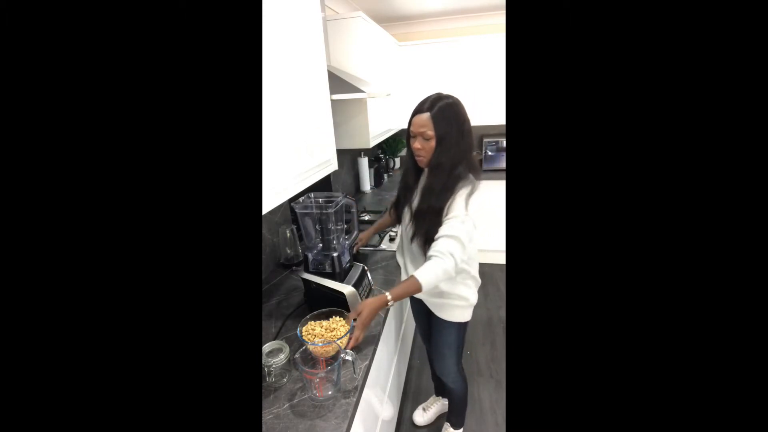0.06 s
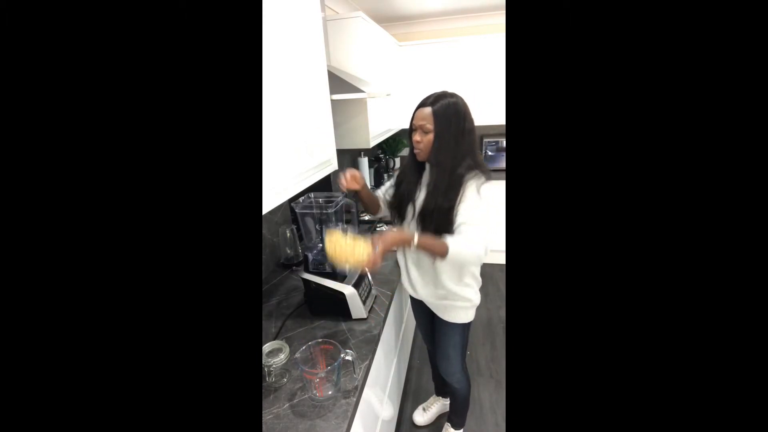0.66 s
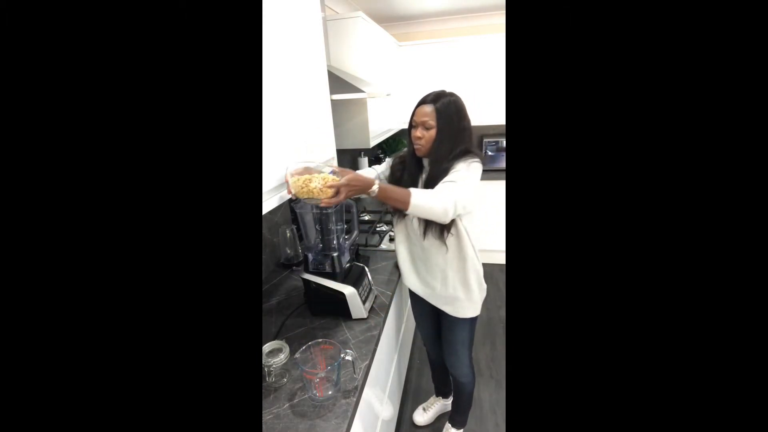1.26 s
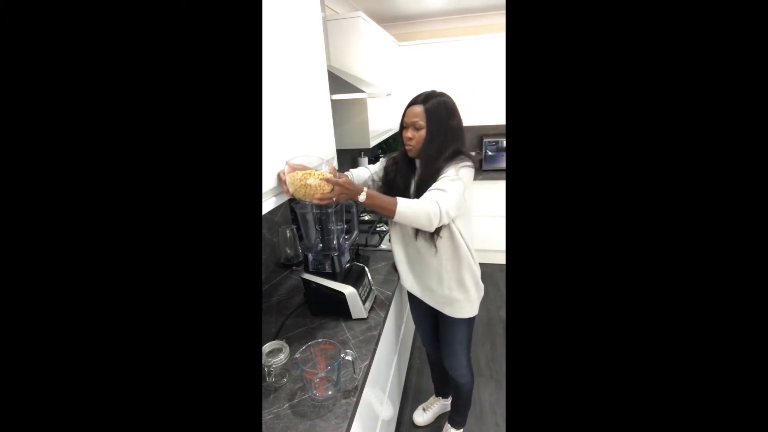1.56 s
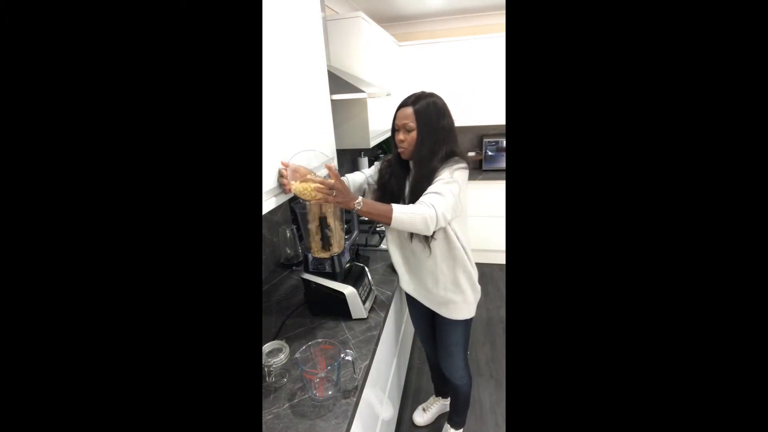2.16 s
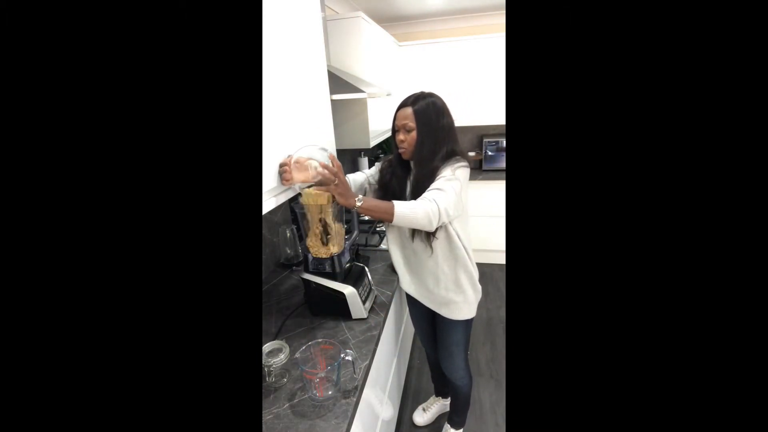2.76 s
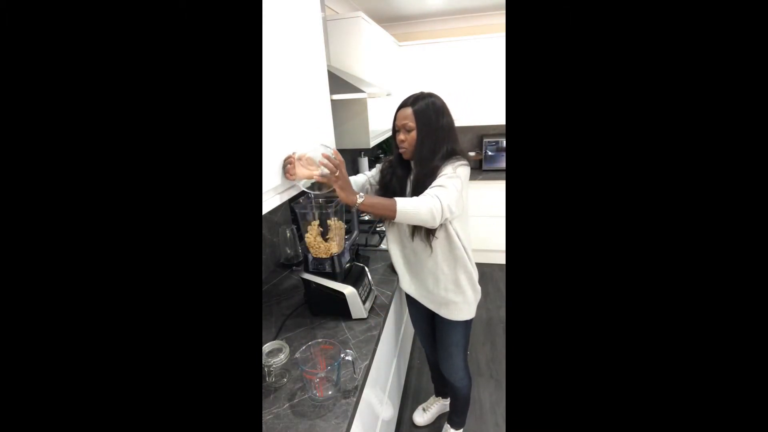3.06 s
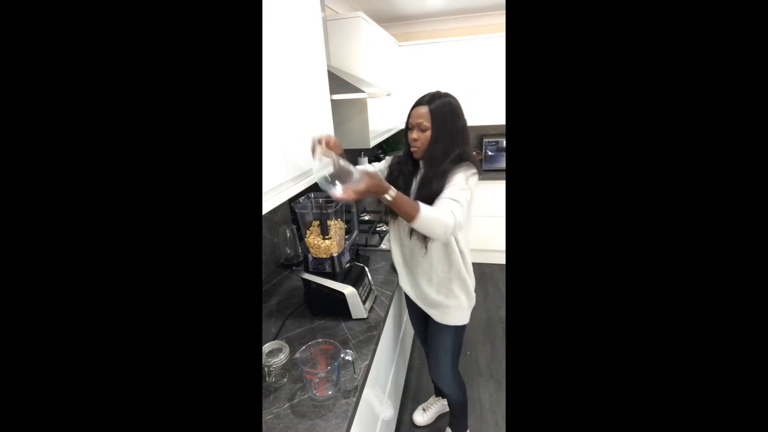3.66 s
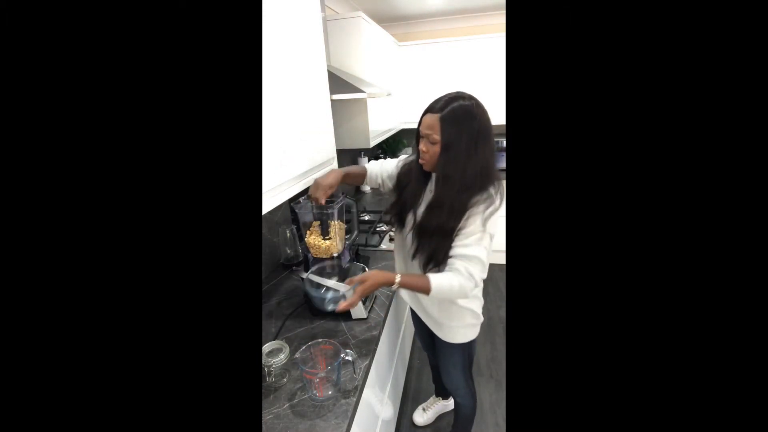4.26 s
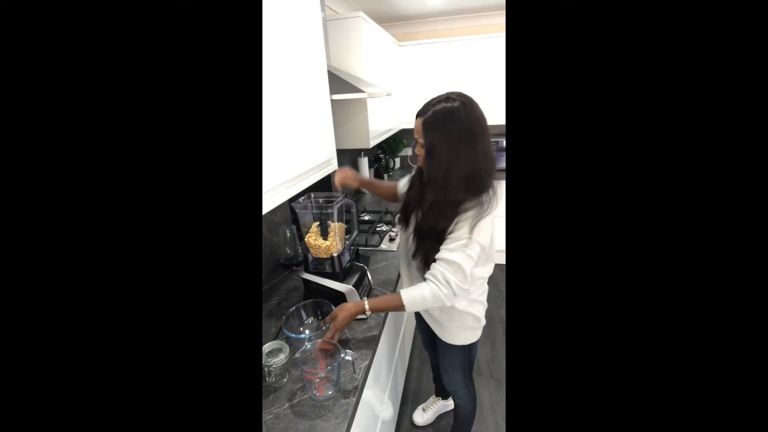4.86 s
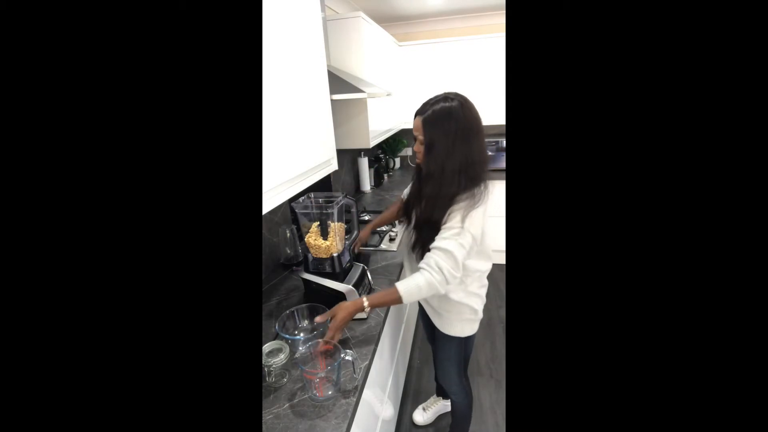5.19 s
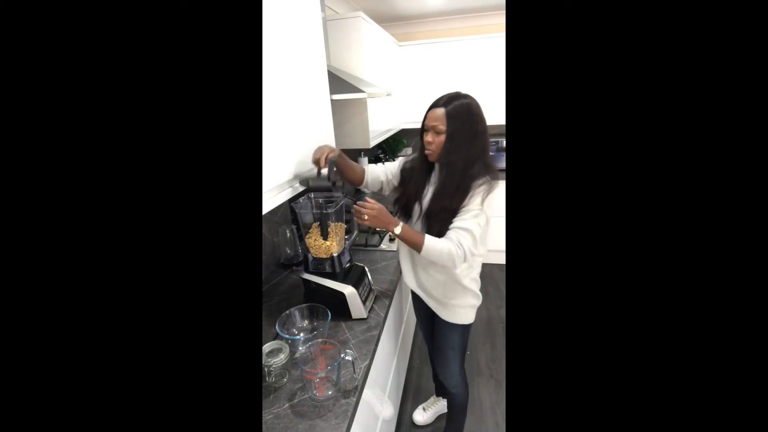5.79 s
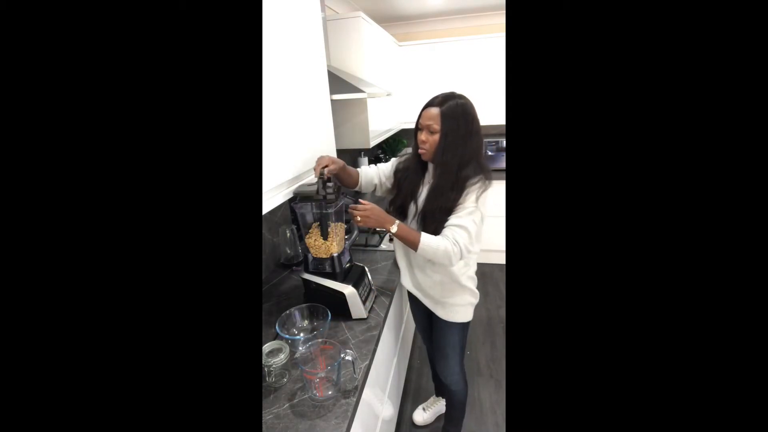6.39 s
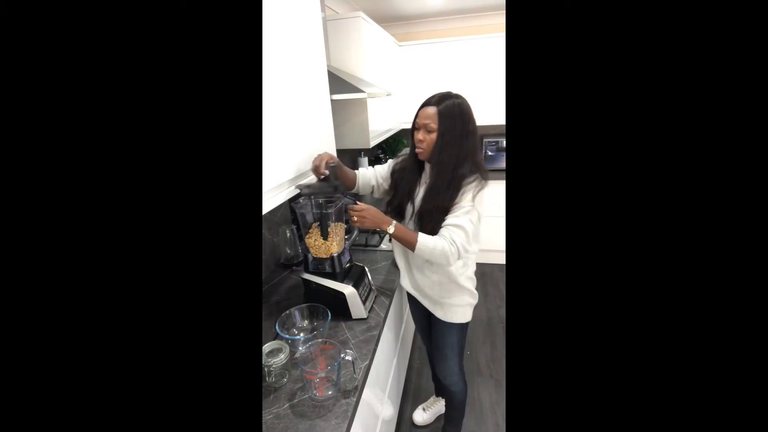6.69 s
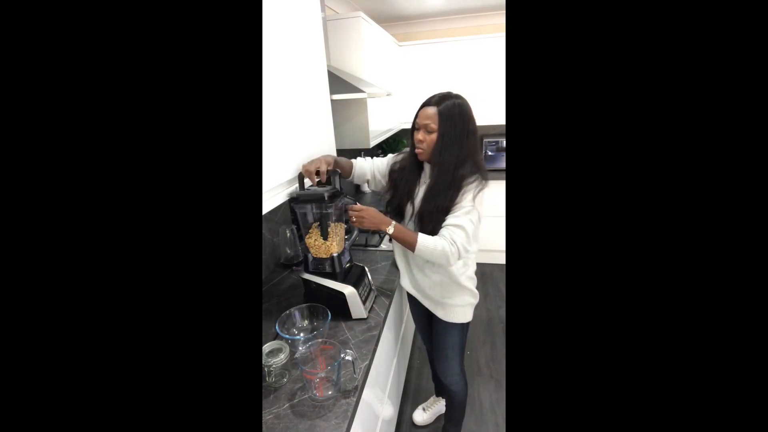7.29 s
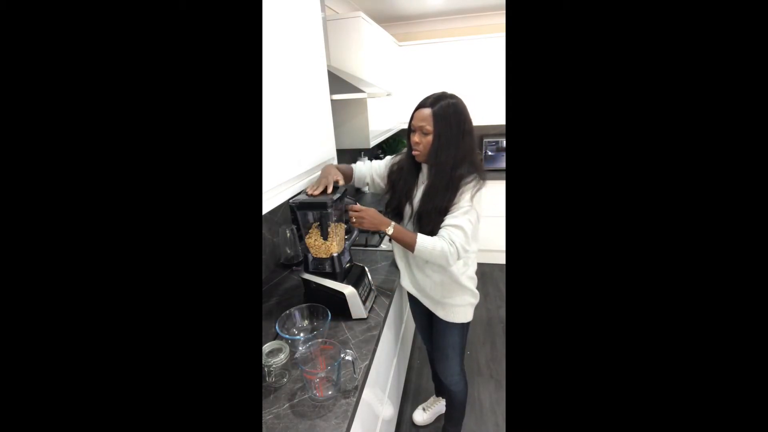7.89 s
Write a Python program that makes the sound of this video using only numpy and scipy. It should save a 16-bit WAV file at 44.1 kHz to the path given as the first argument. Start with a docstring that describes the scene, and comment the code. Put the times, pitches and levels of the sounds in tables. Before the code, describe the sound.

Roasted nuts rattle from a glass bowl into a plastic blender jug, then the bowl knocks down and the lid clatters on.

```python
"""In a hard-walled kitchen, roasted nuts are tipped from a glass bowl into a plastic blender jug.
A few nuts tink against the glass, then the stream rattles into the jug, where the growing heap
damps the ringing. The jug is jostled, the bowl booms down on the worktop, and the lid is knocked
about and pressed home. Cupboards and tiles echo, and an appliance hums faintly."""
import sys
import numpy as np
from scipy import signal
from scipy.fft import rfft, irfft
from scipy.io import wavfile
from scipy.ndimage import uniform_filter1d

SR = 44100
rng = np.random.default_rng(int(sys.argv[2]) if len(sys.argv) > 2 else 0)


def master(y):
    """Save y as 16-bit WAV."""
    cut = np.clip(np.atleast_2d(y).T, -1, 1)
    pcm = np.round(cut * 32767)  # scale
    wavfile.write(sys.argv[1], SR, pcm.astype(np.int16))


N = 350154
TIME = np.arange(N) / SR

POUR_START_S, DRY_UP_S, LAST_NUT_S = 1.878, 2.96, 3.27
FULL_FLOW_DB, FULL_FLOW_PER_S, FLOW_POWER = -13, 950, 0.83  # a stronger stream has more clicks a second
DRUM_DB, CLATTER_DB, EDGE_DB = -6.5, -8, -12.5  # wall, nut on nut and crisp edges, relative to the stream
HEAP_DULLS_DB_PER_S = 3  # the growing heap softens the edges

# Notes of the jug wall when nuts drum on it: (pitch [Hz], width [Hz], boost [dB])
WALL_NOTES = [(732, 23, 3.9), (1008, 210, 2.4)]
def pouring_nuts(nut_ring_db=-8, nut_q=4.5, wall_share=.22, attack_s=.014, release_s=.14, pitches=14):
    """Hundreds of nuts click and bounce on each other, each with a brief pitch; some drum on the wall."""
    level_db = stream_db()
    clicks_per_s = FULL_FLOW_PER_S * from_db(FLOW_POWER * (level_db - FULL_FLOW_DB))
    clicks = random_clicks(clicks_per_s, spread_db=3)
    pitch_of_click = rng.integers(0, pitches, N)
    force = np.zeros(N)
    for k, hz in enumerate(np.geomspace(1300, 8000, pitches)):
        bounce = contact(length_s=.0024, rattle_db=-15, rattle_s=.043)[:SR // 40]
        nuts = signal.oaconvolve(clicks * (pitch_of_click == k), bounce)[:N]
        nut_ring = signal.lfilter(*signal.iirpeak(hz, nut_q, fs=SR), nuts + 1e-18)
        force += nuts + from_db(nut_ring_db) * nut_ring
    clatter = in_jug(force)
    wall_clicks = clicks * (rng.random(N) < wall_share)
    drumming = resonate(in_jug(wall_clicks), WALL_NOTES)
    age = TIME - POUR_START_S
    layers = [(band(drumming, 50, 1880), DRUM_DB),
              (band(clatter, 1590, 4850), CLATTER_DB),
              (band(clatter, 5340, 19500), EDGE_DB - HEAP_DULLS_DB_PER_S * age)]
    out = np.zeros(N)
    for layer, db in layers:
        power = uniform_filter1d(layer ** 2, int(.06 * SR))
        evened_out = layer / np.sqrt(np.abs(power) + .024 * np.mean(layer ** 2))
        out += from_db(level_db + db + clumping_db()) * evened_out
    return out * np.clip(age / attack_s, 0, 1) * np.clip((LAST_NUT_S - TIME) / release_s, 0, 1)


# How strongly the nuts pour: (time [s], relative level [dB])
STREAM_STRENGTH = [(1.9, -20), (1.938, -19.5), (1.982, -8), (2.138, -16), (2.462, -15.5), (2.62, -18),
                   (2.708, -17.5), (2.748, -19), (2.756, -18), (2.986, -21), (3.0, -18)]
def stream_db(thinning_s=.094, stragglers_db=-17.5):
    """The stream runs until the bowl is nearly empty, then thins to a few stragglers."""
    thinned = np.clip((TIME - DRY_UP_S) / thinning_s, 0, 1)
    return np.interp(TIME, *np.transpose(STREAM_STRENGTH)) + stragglers_db * thinned


def clumping_db(spread_db=2.5, clumps_per_s=45, count=500):
    """The nuts arrive in uneven clumps, so the level wanders at random."""
    return spread_db * np.interp(TIME * clumps_per_s, np.arange(count), rng.standard_normal(count))


# Nuts that hit hard: (time [s], relative level [dB], drumming compared with the click [dB])
NUT_HITS = [(1.8814, -22.5, 9.5), (1.8877, -19.5, 2.5), (1.958, -15, -10.5), (1.9844, -17.5, 2),
            (2.0324, -14, -29), (2.2514, -18, -7), (2.2149, -22, 7.5), (2.329, -21, 9), (2.4154, -17, 1),
            (2.4748, -22, 3), (2.6713, -17.5, -10), (2.6992, -16, 2), (2.7556, -23.5, 6), (2.807, -18.5, 6),
            (2.8958, -21.5, -8), (2.9144, -21.5, -8), (3.043, -18, -5), (3.0785, -20, 1),
            (3.1757, -36.5, -1), (3.2036, -38.5, 6.5)]
def hard_nuts():
    """Single nuts strike the wall of the jug and skitter."""
    force = np.zeros(N)
    for s, db, drum_db in NUT_HITS:
        skitter = contact(length_s=.00312, rattle_db=-1, rattle_s=.038, firm=.19)
        click = colour(skitter, [(1400, drum_db), (2800, .011)])
        add(force, s, strike_level(click, db))
    return in_jug(force)


# Tone of nuts landing in the jug: (pitch [Hz], level [dB])
NUT_TONE = [(60, -5), (200, -19.5), (330, -10), (480, -2), (1000, -4.5), (2000, 2), (3600, 1.5), (5000, -7),
            (7200, -8.5), (10000, -18.5), (16000, -27.5)]
# Notes of the open jug, empty and then filled: (pitch [Hz], width [Hz], boost [dB])
EMPTY_JUG_NOTES = [(381.5, 14, 6), (570, 22, 7), (721, 16, 23), (997, 40, 16), (1290, 50, 4),
                   (1377, 40, 10), (1439, 22, 14), (1793, 24, 8), (2006, 14, 10), (2215, 30, 6),
                   (2670, 80, 6), (2783, 39, 4.5), (3215, 90, 5), (4300, 50, 10), (5550, 250, 4.5),
                   (7180, 200, 4.5)]
FILLED_JUG_NOTES = [(431, 27, 6.4), (577.5, 58, 10), (745, 39, 8), (940, 83, 5.95), (1260, 89, 8.8),
                    (1338, 70, 8.4), (1448, 80, 7), (1710, 60, 3.4), (2630, 120.3, 2.3), (3230, 150, 2),
                    (5800, 1000, 4.3)]
def in_jug(force):
    """The empty jug rings clearly; the growing heap damps and shifts its notes."""
    fill = np.interp(TIME, [2.3, 2.8, 3.0], [0, .35, 1])
    force = colour(force, NUT_TONE)
    return resonate(force * (1 - fill), EMPTY_JUG_NOTES) + resonate(force * fill, FILLED_JUG_NOTES)


# Tone of the plastic: (pitch [Hz], level [dB])
PLASTIC_TONE = [(200, 3.5), (600, 1), (1500, -4), (3500, -11), (7000, -20), (10000, -27), (16000, -31)]
# Notes of the full jug when knocked, lid off and lid on: (pitch [Hz], width [Hz], boost [dB])
LID_OFF_NOTES = [(344, 14, 10), (385, 30, 6.5), (409, 22, 3.4), (540, 24, 1.8), (671, 40, 6.1),
                 (1040, 44, 2), (1456, 55, 3), (2204, 120, 2.8), (2800, 180, 1.1)]
LID_ON_NOTES = [(361.5, 19, 8.9), (417, 12, 1.9), (520, 57, 8.7), (576, 8.1, 12.1), (651, 34, 11.3),
                (832, 20, 4.6), (1336, 55, 4.9), (2240, 22, 2.9), (2920, 340, 0.33), (6550, 600, 2.4),
                (7900, 110, 2.4)]
# Knocks on the jug and lid, and one low footstep at 4.064 s: (time [s], relative level [dB], weight on the
# worktop [dB], brightness [dB], contact length [s])
JUG_KNOCKS = [(1.391, -46, -53, 0.5, .012), (1.653, -43.5, -48, 1.5, 0.019), (3.789, -47, -62, 5.5, 0.019),
              (4.064, -53, -53, -4, 0.048), (4.237, -43, -39, -4.5, 0.01), (4.254, -36, -36, -1.5, 0.036),
              (4.293, -31, -23, -2.5, .01), (4.355, -35.5, -44, 1, 0.011), (4.405, -42, -33, -3, 0.0038),
              (4.468, -39, -34.5, -1, 0.024), (4.513, -41, -37, -5, 0.0078), (4.587, -51, -44, -8, 0.0066),
              (5.75, -33, -26.5, 1, 0.0031), (5.907, -31.5, -29.5, -0.5, 0.0085),
              (6.058, -47.5, -43, -1, 0.013), (6.07, -53.5, -36.5, -13, 0.0011),
              (6.171, -46.5, -54, -3, 0.0058), (6.194, -52.5, -70, 10, 0.0028),
              (6.273, -57.5, -58, 13, 0.0022), (6.363, -50.5, -41.5, -7, 0.0088),
              (6.475, -49.5, -48.5, 2, 0.0034), (6.616, -46.5, -47.5, 5, 0.0044),
              (6.953, -30, -34.5, -8, 0.005), (7.104, -40, -34.5, 0, 0.0084),
              (7.169, -31, -35.5, -2.5, 0.0057), (7.254, -41, -38, -9, 0.016),
              (7.268, -41, -54, -5.5, 0.0041), (7.33, -44.5, -46, 11.5, 0.0023),
              (7.419, -34.5, -36, -3, 0.0066), (7.435, -28, -41, -4.5, 0.0048),
              (7.454, -27.5, -60, -2, 0.0021), (7.47, -31, -59, -3, 0.0022), (7.483, -22.5, -33.5, 3, .002),
              (7.542, -25, -46, 1.5, .012), (7.556, -47, -33, 10, .003), (7.763, -36.5, -43, 5.5, 0.0021),
              (7.788, -30, -71, -0.5, 0.0024), (7.815, -53, -39.5, 11, 0.003),
              (7.865, -41.5, -61, 5.5, 0.0018)]
def jug_knocks(lid_on_s=6.9):
    """The jug is knocked, scuffed and snapped; it rings hollower once the lid is on."""
    out = np.zeros(N)
    for s, db, weight_db, bright_db, length_s in JUG_KNOCKS:
        firm = .65 * np.exp(-length_s / .006)  # brief contacts tap more firmly
        force = contact(length_s, rattle_db=-5, rattle_s=.15, firm=firm, swell=.29)
        notes = LID_ON_NOTES if s > lid_on_s else LID_OFF_NOTES
        body = resonate(colour(force, PLASTIC_TONE), notes)
        add(out, s, knock(body, db, weight_db, bright_db, thud_db=2.5, boom_db=1.2))
    return from_db(-1.09) * out


# Tone of the worktop: (pitch [Hz], level [dB])
WORKTOP_TONE = [(200, 9.5), (700, -5.5), (1300, -6.5), (2300, -5.5), (3300, -19), (5000, -32.5),
                (9000, -41), (16000, -55.5)]
# Notes of the worktop: (pitch [Hz], width [Hz], boost [dB])
WORKTOP_NOTES = [(277, 16, 11.3), (342, 28, 11.6), (420, 22, 6), (524, 28, 9.3), (624, 38, 7.7),
                 (699, 71, 10.5), (845, 230, 4.5), (1050, 280, 6), (1470, 160, 3), (1980, 34, 2.4)]
# High ring of the bowl struck on its foot: (pitch [Hz], relative level [dB], ring time [s])
BOWL_FOOT_RING = [(7895, -7, .42), (7913, .5, .3), (9313, -7.5, .36), (10640, -21, .16)]
# The bowl scuffs the worktop as it is picked up, later lands on it and rocks:
# (time [s], relative level [dB], weight on the worktop [dB], brightness [dB], contact length [s])
BOWL_KNOCKS = [(0.114, -45.5, -36, -0.5, .0035), (4.906, -22.5, -25, -8, 0.00423),
               (5.057, -37, -36, -6.5, 0.0046), (5.092, -39, -44, -10.5, 0.0037),
               (5.156, -42.5, -37, -9, 0.0031), (5.189, -51, -39, -16.5, 0.0029)]
def bowl_on_worktop():
    """Heavy glass booms on the worktop; the hardest touch also sets the bowl ringing."""
    out = np.zeros(N)
    for s, db, weight_db, bright_db, length_s in BOWL_KNOCKS:
        force = contact(length_s, rattle_db=-12.5, rattle_s=.21, firm=.27)
        body = resonate(colour(force, WORKTOP_TONE), WORKTOP_NOTES)
        add(out, s, knock(body, db, weight_db, bright_db, thud_db=-19, boom_db=-.9))
    landing_s = max(BOWL_KNOCKS, key=lambda row: row[1])[0]
    add(out, landing_s, from_db(-44) * ring(BOWL_FOOT_RING))
    return from_db(1.56) * out


# Deep notes of the worktop and base under a heavy knock: (pitch [Hz], relative level [dB], ring time [s])
WORKTOP_THUD = [(58.5, 8, 0.14), (68.5, -13.5, .15), (87.3, -4.5, 0.2)]
BASE_BOOM = [(145.7, -1, 0.081), (118.9, -0.5, 0.074), (175, -7, 0.058), (207.3, -12, .12)]
def knock(body, db, weight_db, bright_db, thud_db, boom_db, thud_rise_s=.028, boom_rise_s=.0021):
    """Weight sets the worktop and base swinging; a brighter knock has less hollow ring and more tick."""
    thud = ring(WORKTOP_THUD, spread_db=6.5) * (1 - np.exp(-TIME[:SR] / thud_rise_s))
    boom = ring(BASE_BOOM, spread_db=1) * (1 - np.exp(-TIME[:SR] / boom_rise_s))
    bass = strike_level(thud, weight_db + thud_db) + strike_level(boom, weight_db + boom_db)
    hollow = strike_level(band(body, 280, 1220), db - bright_db)
    clack = strike_level(band(body, 1414, 4060), db - 4 + .36 * bright_db)
    tick = strike_level(band(body, 4900, 17000), db - 15 + bright_db)
    return bass + hollow + clack + tick


# Ring of the glass bowl held in the hand: (pitch [Hz], relative level [dB], ring time [s])
HELD_BOWL_RING = [(1704, -12, .14), (1759, -3, 0.093), (2940, -12, .05), (3080, -8.5, .11),
                  (3135, 2, 0.052), (4790, -9.5, 0.05), (4860, -8, .06), (6820, -12.5, .06),
                  (9240, -18.5, .05), (12010, -25.5, .03)]
# Nuts shifting against the glass: (time [s], relative level [dB], treble [dB])
BOWL_TINKS = [(0.977, -44.5, 3), (0.991, -50.5, 11), (0.994, -37.5, 12.5), (1.011, -45, -13.5),
              (1.032, -42.5, -24), (1.248, -53, -6), (1.475, -40, -22), (1.527, -40.5, -24),
              (1.544, -44, -0.5), (1.578, -48, 0), (1.6, -43, 11), (1.706, -46, -7)]
def bowl_tinks():
    """Nuts tap and chatter on the glass as the bowl is tilted; the heap damps its ring."""
    out = np.zeros(N)
    for s, db, treble_db in BOWL_TINKS:
        tap = contact(length_s=.0015, rattle_db=-10, rattle_s=.1, firm=.45)
        force = colour(tap, [(3200, 0), (8000, treble_db)])
        glass = signal.fftconvolve(force, ring(HELD_BOWL_RING))[:SR]
        click = band(force, 2000, 10000)
        add(out, s, strike_level(glass, db - 4) + strike_level(click, db - 22.5))
    return out


def sliding_nuts(start_s=1.44, attack_s=.049, rise_db_per_s=3, spill_s=.009):
    """Nuts creep faster as the bowl tilts, rustling and ringing the glass, then spill over the rim."""
    tilting_s = np.clip(TIME - start_s, 0, POUR_START_S - start_s)
    creeping = np.minimum(tilting_s / attack_s, 1) * (TIME < POUR_START_S)
    creep = from_db(-54 + rise_db_per_s * tilting_s) * creeping
    spill = from_db(-33) * np.exp(-np.abs(TIME - POUR_START_S) / spill_s)
    grains = (creep + spill) * rms_one(random_clicks(per_s=5000, spread_db=6))
    glass = ring(HELD_BOWL_RING)
    singing = signal.fftconvolve(grains, glass / np.sqrt(np.sum(glass ** 2)))[:N]
    rustle = band(grains, 980, 3500, order=2)
    return from_db(-1.5) * singing + from_db(5) * rustle


# Strokes of plastic and sleeves rubbing: (time of the peak [s], level [dB], swell and fade time [s])
RUBS = [(0.24, -50.5, 0.016), (3.85, -64, 0.072), (4.32, -49.5, 0.056), (4.5, -49, 0.075),
        (6.2, -52.5, 0.15), (6.78, -59.5, 0.14), (7.28, -48, 0.22), (7.47, -36, 0.019),
        (7.83, -41.5, 0.058)]
def rubbing():
    """Plastic slips on plastic in tiny jerks; each stroke swells and fades."""
    slips = random_clicks(per_s=1500, spread_db=-4)
    plastic = resonate(colour(slips, PLASTIC_TONE), LID_ON_NOTES)
    pressure = sum(from_db(db) * np.exp(-np.abs(TIME - s) / length_s) for s, db, length_s in RUBS)
    return pressure * rms_one(band(plastic, 760, 15000, order=1))


def squeak(at_s=.785, width_s=.003, hz=1210):
    """One faint, short squeak as the bowl is lifted."""
    return from_db(-48) * np.exp(-((TIME - at_s) / width_s) ** 2) * np.sin(2 * np.pi * hz * TIME)


# How long the kitchen echoes: (pitch [Hz], ring time [s])
ECHO_TIMES = [(60, 0.3), (200, 0.41), (500, 0.65), (1500, 0.65), (4000, 0.75), (8000, 0.11), (16000, 0.55)]
# Tone of the echoes: (pitch [Hz], level [dB])
ECHO_TONE = [(60, 1), (200, 4.5), (600, 1.5), (1500, 1), (4000, 0), (8000, 0), (16000, -6.5)]
def kitchen_echo(x, delay_s=.0016, near_db=-7, near_s=.021):
    """Sound bounces off cupboards and tiles and blurs into a short, smooth tail."""
    edges, tail = np.geomspace(35, 18000, 13), 0
    for low, high in zip(edges, edges[1:]):
        ring_s = at_hz(ECHO_TIMES, np.sqrt(low * high))
        tail += band(rng.standard_normal(SR), low, high) * fade(ring_s)
    arrival = np.clip(TIME[:SR] / delay_s - 1, 0, 1)
    near_walls = 1 + from_db(near_db) * np.exp(-TIME[:SR] / near_s)  # strong early echoes from the corner
    spectrum = rfft(tail * arrival * near_walls, 2 * SR)
    power = np.abs(uniform_filter1d(np.abs(spectrum) ** 2, 30))
    even_spectrum = spectrum / np.sqrt(power + 1e-3 * np.mean(power))  # no pitch sticks out
    echoes = irfft(even_spectrum)[:SR] * arrival
    return signal.fftconvolve(x, colour(echoes, ECHO_TONE))[:N]


# Tone of the room's steady noise: (pitch [Hz], relative level [dB])
ROOM_TONE = [(15, -51), (25, 0), (108, -7.5), (130, -8), (212, -12), (242, -9), (309, -14), (384, -10.5),
             (416, -20), (489, -15.5), (840, -21), (1160, -22), (1480, -24), (7510, -32.5), (16000, -44)]
# Hum of an appliance: (pitch [Hz], average level [dB])
APPLIANCE_HUM = [(140, -66), (242.2, -70.5), (344.5, -74.5), (382.2, -64)]
def room_noise(noise_db=-54.5):
    """An appliance hums faintly in the steady noise of the room."""
    hum = sum(np.sqrt(2) * from_db(db) * np.sin(2 * np.pi * hz * TIME) for hz, db in APPLIANCE_HUM)
    noise = colour(rng.standard_normal(N), ROOM_TONE, size=16384)
    return hum + from_db(noise_db) * rms_one(noise)


def random_clicks(per_s, spread_db):
    """Clicks at random times; a few are much louder, or much softer if the spread is negative."""
    sizes = from_db(spread_db * np.minimum(rng.exponential(1, N), 3.5)) * rng.choice([-1, 1], N)
    return sizes * (rng.random(N) < per_s / SR)


def contact(length_s, rattle_db, rattle_s, firm=0., swell=.23):
    """A rough touch that builds up and dies away, a firm tap at its height, then a weaker rattle."""
    age = TIME[:SR] / length_s
    rise = 1 - np.exp(-age / swell)
    fall = np.exp(-age) + from_db(rattle_db) * fade(rattle_s)
    force = rng.standard_normal(SR) * rise * fall
    force[np.searchsorted(age, swell)] += firm * np.sqrt(np.sum(force ** 2))
    return force


def ring(notes, spread_db=0):
    """The fading notes of a struck object; the spread varies their strength from hit to hit."""
    out = np.zeros(SR)
    for hz, db, ring_s in notes:
        strength = from_db(db + spread_db * rng.standard_normal())
        out += strength * fade(ring_s) * np.sin(2 * np.pi * hz * TIME[:SR])
    return out


def resonate(x, notes):
    """Boost the pitches at which an object likes to ring."""
    for hz, width_hz, db in notes:
        damping, cosine = np.pi * width_hz / SR, np.cos(2 * np.pi * hz / SR)
        lift = damping * from_db(db)
        x = signal.lfilter([1 + lift, -2 * cosine, 1 - lift],
                           [1 + damping, -2 * cosine, 1 - damping], x + 1e-18)
    return x


def colour(x, tone, size=2048):
    """Shape a sound with a tone table, using a minimum-phase filter so nothing sounds early."""
    gains = from_db(at_hz(tone, np.fft.rfftfreq(size, 1 / SR)))
    cepstrum = irfft(np.log(gains))
    cepstrum[1:size // 2] *= 2
    cepstrum[size // 2 + 1:] = 0
    response = irfft(np.exp(rfft(cepstrum)))
    return signal.oaconvolve(x, response)[:len(x)]


def band(x, low_hz, high_hz, order=3):
    """Keep the pitches between two limits."""
    return signal.sosfilt(signal.butter(order, [low_hz, high_hz], "band", fs=SR, output="sos"), x + 1e-18)


def fade(ring_s):
    """One second of dying away; the ring time is how long it takes to fall 60 dB."""
    return from_db(-60 * TIME[:SR] / ring_s)


def strike_level(x, db):
    """Set the average (rms) level of the first 30 ms."""
    return from_db(db) * x / np.sqrt(np.mean(x[:int(.03 * SR)] ** 2) + 1e-20)


def rms_one(x):
    """Scale to an average (rms) level of one."""
    return x / np.sqrt(np.mean(x ** 2) + 1e-20)


def from_db(db):
    """Turn decibels into a multiplier."""
    return 10 ** (np.asarray(db) / 20)


def at_hz(table, hz):
    """Read a table at any pitch, with octaves evenly spaced."""
    pitches, values = np.transpose(table)
    return np.interp(np.log(np.maximum(hz, 1)), np.log(pitches), values)


def add(out, s, sound):
    """Mix a sound in from time s."""
    start = int(round(s * SR))
    out[start:start + len(sound)] += sound[:N - start]


def scene():
    """Nuts, glass and plastic are heard directly and as echoes, over the room's noise."""
    nuts = pouring_nuts() + hard_nuts()
    glass = bowl_tinks() + sliding_nuts()
    plastic = jug_knocks() + rubbing()
    bowl = bowl_on_worktop()
    to_room = from_db(-1) * nuts + from_db(-4.5) * (glass + plastic) + from_db(-4) * bowl
    return (nuts + glass + plastic + bowl + squeak() + kitchen_echo(to_room) + room_noise())[None]


def record(dry, low_hz=42, high_hz=16000, ceiling=.95):
    """A small microphone loses the deepest bass; the highest peaks are rounded and the top is cut."""
    thin = signal.sosfilt(signal.butter(8, low_hz, "high", fs=SR, output="sos"), dry)
    rounded = thin / (1 + (thin / ceiling) ** 6) ** (1 / 6)
    return signal.sosfilt(signal.ellip(12, .1, 90, high_hz, fs=SR, output="sos"), rounded)


dry = scene()
out = record(dry)
master(out)
```